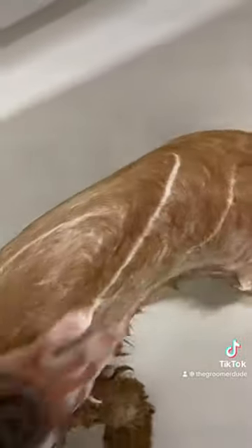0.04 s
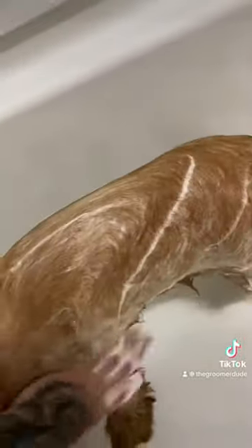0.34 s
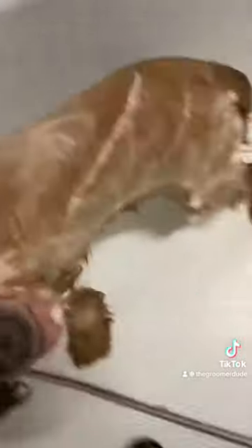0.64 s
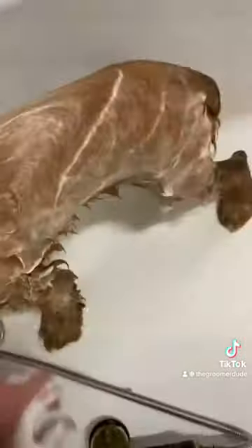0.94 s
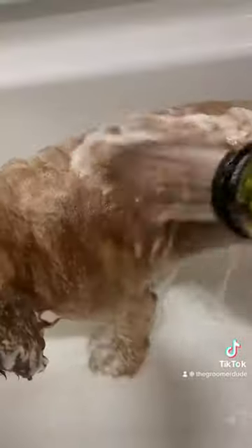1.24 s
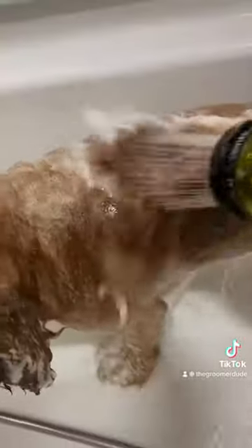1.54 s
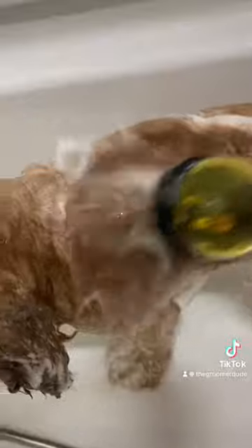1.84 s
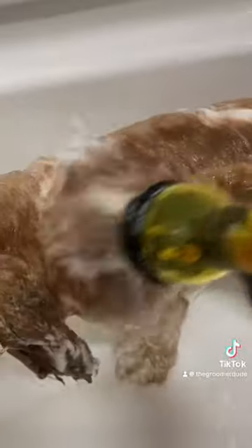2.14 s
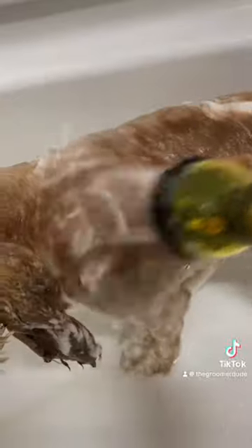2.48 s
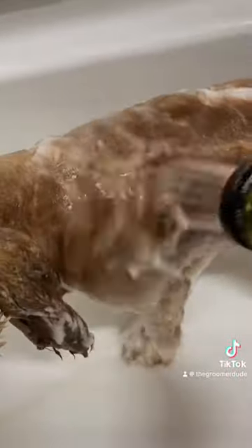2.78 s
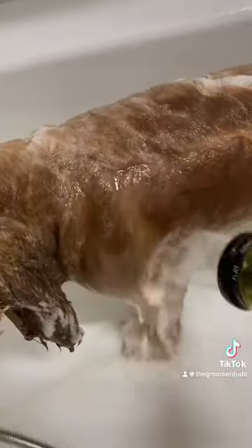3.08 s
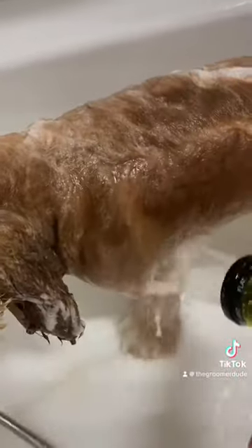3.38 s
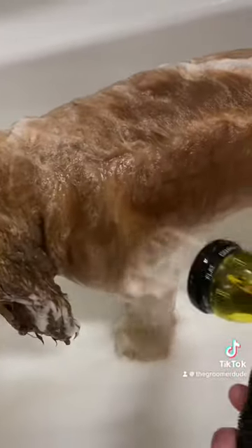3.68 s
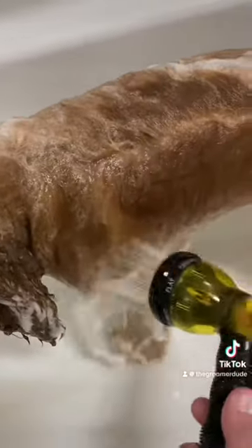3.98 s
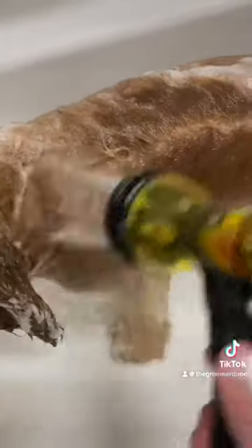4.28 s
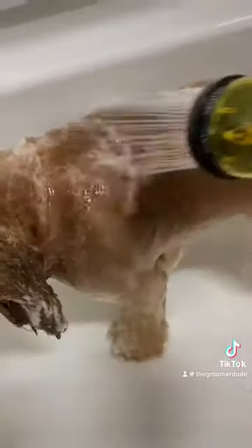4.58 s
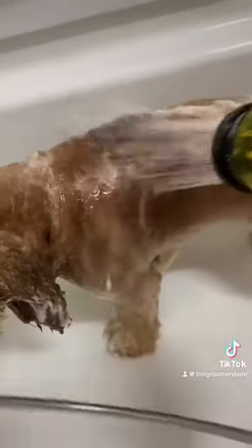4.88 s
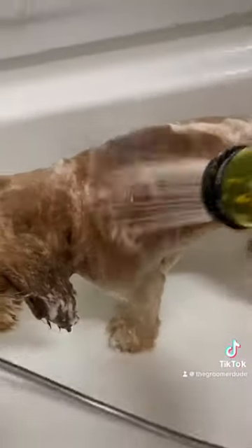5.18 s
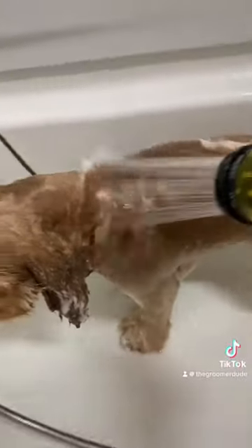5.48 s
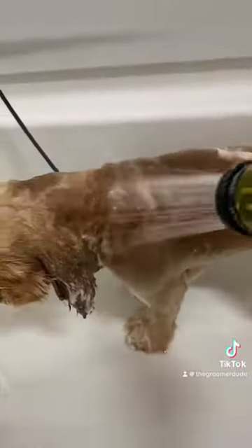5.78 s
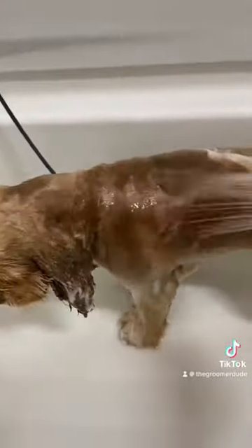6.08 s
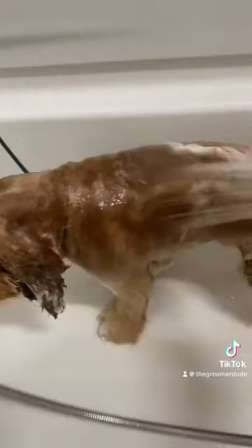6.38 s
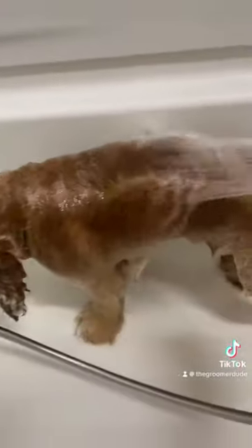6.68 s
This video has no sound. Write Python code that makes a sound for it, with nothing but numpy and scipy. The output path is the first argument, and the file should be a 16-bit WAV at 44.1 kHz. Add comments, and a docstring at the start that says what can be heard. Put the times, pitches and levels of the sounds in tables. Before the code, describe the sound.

For the first second, only a blower is heard, droning somewhere in the room with rushing air, a low rumble and wavering hums. At about 0.9 seconds a hand sprayer opens abruptly, close by, and starts rinsing a dog in a tub. Fine jets make a bright hiss and fizz, with dense droplets pattering on the wet coat. The spray swells and dulls about four times a second as the head moves along the body. Small bubbles ping and wet hollows ring briefly at shifting pitches, and the tub walls add tight reflections. Short, bright spits and single fat drops stand out at around 1, 1.6, 2.8, 3.7 and 4.8 seconds. From about 4 seconds the hiss is slightly softer, but the water keeps running until the end, near 7 seconds. The blower continues behind it throughout, one low hum growing a little stronger after 5 seconds.

```python
"""A hand sprayer rinses a soapy dog in a tub. It opens at once; its fine jets hiss and patter on the
wet coat as dense droplet clicks, swelling and dulling as the head sweeps along the body.
Wet hollows and small bubbles ring, and the tub walls throw the spray back.
Behind it a blower drones in the room: rushing air, rumble, narrow resonances and hums."""
import sys
import numpy as np
from scipy import signal
from scipy.fft import rfft, irfft, next_fast_len
from scipy.io import wavfile
from scipy.ndimage import map_coordinates

SR = 44100
rng = np.random.default_rng(int(sys.argv[2]) if len(sys.argv) > 2 else 0)


def wav_out(sig):
    """Save sig, one row per channel (or a flat mono array), as 16-bit PCM at SR to the path in sys.argv[1]."""
    wavfile.write(sys.argv[1], SR, np.round(np.clip(np.atleast_2d(sig).T, -1, 1) * 32767).astype(np.int16))


N = 301203
TIME = np.arange(N) / SR
OPEN_S = 0.921   # trigger squeezed

# left-right likeness of the spray: (frequency [Hz], correlation [0..1])
SPRAY_CORRELATION = [(700, 1), (1200, 0.86), (1500, 1), (2100, 1), (2800, 0.62), (3500, 0.7), (5500, 0.83),
                     (10000, 0.45), (14000, 0.56)]


def from_db(db):
    """Decibels to gain."""
    return 10 ** (np.asarray(db) / 20)


def unit_rms(x):
    """Scale to rms 1."""
    return x / np.sqrt(np.mean(x ** 2) + 1e-20)


def in_time(rows):
    """Each value column of a time table, per sample."""
    times_s, *columns = np.transpose(rows)
    return [np.interp(TIME, times_s, column) for column in columns]


def at_hz(points, hz):
    """Read a table on a log-frequency axis."""
    known_hz, values = np.transpose(points)
    return np.interp(np.log(hz + 1e-6), np.log(known_hz), values)


def drift(rate_hz):
    """Smooth random motion below about rate_hz; rms 1."""
    hop, settle = 40, 2000
    pole = np.exp(-2 * np.pi * rate_hz * hop / SR)
    noise = rng.standard_normal(N // hop + settle + 2)
    slow = signal.lfilter([1], [1, -2 * pole, pole * pole], noise)[settle:]
    return np.interp(np.arange(N) / hop, np.arange(len(slow)), unit_rms(slow))


def coloured(pair, spectrum, correlation):
    """Two independent signals to stereo of the given spectrum, with steep skirts; rms 1."""
    size = next_fast_len(N)
    hz = np.arange(size // 2 + 1) * SR / size + 1e-3
    low_hz, high_hz = spectrum[0][0], 1.1 * spectrum[-1][0]
    skirts = 1 / np.sqrt((1 + (low_hz / hz) ** 12) * (1 + (hz / high_hz) ** 12))
    mid, side = rfft(pair, size) * from_db(at_hz(spectrum, hz)) * skirts
    alike = np.clip(at_hz(correlation, hz), 0, 1)
    mid, side = np.sqrt(1 + alike) * mid, np.sqrt(1 - alike) * side
    return unit_rms(irfft(np.array([mid + side, mid - side]), size)[:, :N])


def resonate(x, hz, width_hz):
    """One resonance, applied twice for steep skirts; rms 1."""
    radius = np.exp(-1.55 * np.pi * width_hz / SR)
    section = [1, 0, -1, 1, -2 * radius * np.cos(2 * np.pi * hz / SR), radius * radius]
    return unit_rms(signal.sosfilt([section, section], x + 1e-18))


def room_noise(spectrum):
    """Smooth, distant stereo noise; rms 1."""
    # left-right likeness: (frequency [Hz], correlation [0..1])
    correlation = [(130, 1), (200, 1), (260, 1), (400, 0.95), (570, 0.75), (700, 0.68), (1100, 0.4),
                   (2000, 0.95), (2600, 0.53), (4500, 0.71), (12000, 0.59)]
    return coloured(rng.standard_normal((2, N)), spectrum, correlation)


def drones():
    """Moving air excites narrow resonances; each swells and sinks on its own."""
    # blower and room modes: (frequency [Hz], width [Hz], level [dB])
    modes = [(269.2, 8.2, -53), (293.2, 20.4, -56), (336.6, 19.4, -56.5), (387.4, 14.5, -60.5),
             (477.3, 10.7, -57), (571.5, 27, -59), (901, 48, -59), (1119, 19, -64), (1401, 27, -64),
             (2427, 80, -61), (220, 22, -62)]
    out = np.zeros(N)
    for hz, width_hz, level_db in modes:
        gain = from_db(level_db + 2.2 * drift(rate_hz=1.5))
        out += gain * resonate(rng.standard_normal(N + SR), hz, width_hz)[SR:]
    return out


def wavering_tone(hz, waver_hz, waver_db):
    """Sine, unsteady in pitch and level; rms 1."""
    phase = 2 * np.pi * np.cumsum(hz + waver_hz * drift(rate_hz=4.4)) / SR
    return unit_rms(np.sin(phase) * from_db(waver_db * drift(rate_hz=5.5)))


def hums():
    """The blower's two hums and a faint overtone."""
    # lower hum: (time [s], level [dB])
    low_level = [(0, -47), (.35, -49), (.62, -43), (1.05, -52), (3.3, -52), (3.8, -53), (4.5, -54),
                 (5.4, -59), (6.35, -59), (6.83, -53)]
    # upper hum: (time [s], level [dB])
    high_level = [(0, -47), (.6, -62), (.88, -57), (.95, -45), (1.55, -41.5), (2.35, -51.5), (2.8, -44),
                  (4.5, -47.5), (5.12, -45), (5.35, -39), (6.83, -39)]
    # upper hum: (time [s], frequency [Hz])
    high_pitch = [(0, 90), (5.1, 89.5), (5.8, 88), (6.8, 87.5)]
    low_db, = in_time(low_level)
    high_db, = in_time(high_level)
    high_hz, = in_time(high_pitch)
    low = from_db(low_db) * wavering_tone(hz=52.7, waver_hz=1.65, waver_db=2.5)
    high = from_db(high_db) * wavering_tone(high_hz, waver_hz=0.42, waver_db=1.36)
    overtone = from_db(-57.5) * wavering_tone(hz=266.7, waver_hz=1.0, waver_db=0.0)
    return low + high + overtone


def blower():
    """Rushing air over a roar, a rumble, drones and hums."""
    # spectra of the air noise: (frequency [Hz], relative density [dB])
    rush_spectrum = [(500, -3.5), (680, -6), (900, -3.5), (1300, -6.5), (1500, -10.5), (2500, -12.5),
                     (3600, -16.5), (6000, -21), (8500, -36), (12000, -30.5), (15000, -48)]
    roar_spectrum = [(203, -10.5), (230, -7), (275, -0.5), (330, 0), (400, -4.5), (470, -2.5), (520, -18)]
    rumble_spectrum = [(22, -12), (40, -9), (60, -1), (80, 4.5), (105, 5.5), (122, 1), (142, -7)]
    # rumble: (time [s], level [dB])
    rumble_level = [(0, -49), (1.2, -48), (4.1, -48), (5.2, -51.5), (6.83, -57)]
    rumble_db, = in_time(rumble_level)
    hum = hums()
    rush = from_db(-44.5) * room_noise(rush_spectrum)
    roar = from_db(-45.5) * room_noise(roar_spectrum)
    rumble = from_db(rumble_db) * room_noise(rumble_spectrum)
    return rush + roar + rumble + drones() + hum


def bubbles(per_s, spread_db, cycles, pitch_rise, level_db):
    """Run-off traps small bubbles; each rings briefly and rises in pitch."""
    out = np.zeros((2, N + SR))
    for when, smallness, strength, place in rng.random((int(per_s * N / SR), 4)):
        hz = 900 * 4 ** smallness
        life = np.arange(int(cycles * SR / hz)) * hz / (cycles * SR)   # 0..1
        phase = 2 * np.pi * cycles * (life + pitch_rise * life ** 2 / 2)
        ping = np.sin(phase) * from_db(-40 * life)
        pan = from_db(np.array([[1], [-1]]) * (place - .5) * 6)
        start = int(when * N)
        out[:, start:start + len(ping)] += pan * from_db(spread_db * strength ** 3) * ping
    return from_db(level_db) * unit_rms(out[:, :N])


def impacts(per_s, spread_db):
    """Two streams of droplet clicks, mostly small; rms 1."""
    sizes = from_db(spread_db * np.minimum(rng.exponential(1, (2, N)), 4))
    signs = rng.choice([-1, 1], (2, N))
    hits = rng.random((2, N)) < per_s / SR
    return unit_rms(sizes * signs * hits)


def hollows(drops_per_s, spread_db, wander_octaves, wander_rate_hz):
    """Wet hollows ring as the jets cross them; their pitch wanders as they fill and empty."""
    # crossings: (centre [s], half length [s], frequency [Hz], width [Hz], level [dB])
    crossings = [(1.02, .13, 2470, 500, -45), (1.16, .07, 2600, 600, -46), (1.35, 0.087, 2390, 300, -47),
                 (1.35, .18, 1290, 130, -47), (1.63, .08, 2790, 700, -51), (1.62, 0.12, 1080, 120, -48),
                 (1.68, 0.18, 1310, 130, -52), (1.86, .1, 1190, 150, -45), (1.87, 0.17, 910, 110, -45.5),
                 (1.9, 0.087, 2980, 400, -51), (2.0, .6, 2300, 400, -50), (2.16, 0.075, 830, 300, -44),
                 (2.2, 0.25, 3000, 503, -47.5), (2.37, 0.3, 1204, 50, -49), (2.37, 0.066, 2130, 180, -44),
                 (2.83, 0.11, 1800, 200, -50), (2.95, .22, 4020, 690, -54), (2.97, 0.13, 1700, 220, -46),
                 (3.3, .17, 1740, 220, -48), (3.31, .11, 855, 100, -46.5), (3.32, 0.087, 4050, 600, -47),
                 (3.54, 0.086, 2070, 120, -46), (3.57, .15, 1700, 110, -45.5),
                 (3.76, 0.13, 2050, 110, -44.5), (3.76, 0.166, 1665, 130, -44), (3.75, 0.12, 1010, 70, -48),
                 (3.78, 0.14, 4100, 700, -46), (4.0, 0.091, 1900, 500, -43.5),
                 (4.35, 0.15, 1360, 160, -47.5), (4.53, 0.18, 2130, 200, -50),
                 (4.58, 0.115, 1280, 140, -46), (4.84, 0.055, 2800, 350, -45), (5.02, .13, 2870, 400, -47),
                 (5.02, 0.12, 1600, 180, -50), (5.25, 0.32, 994, 60, -49.5), (5.54, 0.145, 1035, 90, -45.5),
                 (5.9, 0.31, 1020, 55, -47.5), (6.15, .2, 2490, 110, -49.5), (6.15, 0.35, 2450, 600, -52),
                 (6.55, .3, 1025, 55, -49.5), (6.79, .07, 1900, 400, -43), (6.79, .06, 2700, 700, -43.5)]
    out = np.zeros(N)
    drops = impacts(drops_per_s, spread_db)
    pitch_ratio = 2 ** (wander_octaves * drift(wander_rate_hz))
    for k, (centre_s, half_s, hz, width_hz, level_db) in enumerate(crossings):
        hit = np.abs(TIME - centre_s) < half_s
        ring = resonate(drops[k % 2, hit], hz, width_hz)
        ring = map_coordinates(ring, [np.cumsum(pitch_ratio[hit])], order=3)
        swell = np.cos(np.pi / 2 * (TIME[hit] - centre_s) / half_s) ** 2
        out[hit] += from_db(level_db) * swell * ring
    return out


def tub(x, path_sway):
    """Early echoes off the walls; their paths change as the hand moves."""
    # wall echoes: (delay [s], reflected share [0..1])
    walls = [(.0011, 0.2), (.0023, 0.16), (.0041, 0.63), (.0067, .18), (0.0112, 0.54)]
    out = x.copy()
    for delay_s, share in walls:
        sent_s = TIME - delay_s * (1 + path_sway * drift(rate_hz=0.5725))
        out += share * np.array([map_coordinates(side, [sent_s * SR], order=3) for side in x])
    return out / np.sqrt(1 + sum(share ** 2 for _, share in walls))


def nozzle():
    """Thin jets sizzle as they leave the head, the same wherever it points."""
    # sizzle: (frequency [Hz], relative density [dB])
    spectrum = [(10500, -22), (11600, -8.5), (12300, -17), (13800, -15), (14600, 0), (15800, 0)]
    return from_db(-47.5) * coloured(impacts(per_s=9000, spread_db=3), spectrum, SPRAY_CORRELATION)


def spits():
    """A jet catches a tuft: a short, bright shower. The shortest are single fat drops."""
    # showers: (time [s], level [dB], half length [s])
    showers = [(.966, -35, .0012), (1.043, -40, .022), (1.648, -40, .016), (2.155, -47, .024),
               (2.173, -37, .0012), (2.445, -36, .0008), (2.77, -44, .025), (2.83, -51, .012),
               (3.4, -44, .0008), (3.558, -36, .001), (3.736, -41, .035), (4.598, -44.5, .012),
               (4.708, -42.5, .012), (4.837, -37, .0012), (4.858, -47, .02), (4.924, -40, .0012),
               (5.355, -46, .012), (5.57, -42, .0012), (5.778, -54, .035), (6.11, -51, .025)]
    # shower spectrum: (frequency [Hz], relative density [dB])
    spectrum = [(3500, -23), (6000, 12.5), (8000, 10), (12000, 8.5), (15500, -18)]
    envelope = sum(from_db(level_db) * np.exp(-np.minimum(((TIME - centre_s) / half_s) ** 2, 20))
                   for centre_s, level_db, half_s in showers)
    return envelope * coloured(impacts(per_s=2775, spread_db=2.5), spectrum, SPRAY_CORRELATION)


def wet_coat(x, patchy_db, patchy_rate_hz):
    """Folds and pools in the coat favour ever-changing narrow bands of the midrange."""
    out = 0
    for edge_hz in 800 * 2 ** (np.arange(13) / 5):
        band = signal.sosfiltfilt(signal.butter(10, edge_hz, fs=SR, output="sos"), x)
        out = out + band * from_db(patchy_db * drift(patchy_rate_hz))
        x = x - band
    return out + x


def hand(stroke_half_s, wobble_db):
    """Splatter, fizz and mist levels in dB: slow aim, a swish per stroke, wobble, opening surge."""
    # travel along the body: (time [s], splatter [dB], fizz [dB], mist [dB])
    aim = [(.94, -46, -40.5, -37.5), (1.3, -42.5, -43, -39), (1.9, -43, -42, -38.5),
           (2.45, -45.5, -43.5, -40), (2.7, -43, -43.5, -38.5), (3.0, -43, -41.5, -38),
           (3.2, -43, -44.5, -41), (3.45, -44.5, -45, -39.5), (3.78, -41.5, -41, -39),
           (4.1, -48.5, -45, -42.5), (4.4, -43.5, -46.5, -42.8), (4.75, -45, -48, -43.5),
           (5.2, -43.5, -45.5, -41.5), (5.55, -45, -47.5, -42.5), (5.9, -44, -48, -43),
           (6.3, -43, -48.5, -44), (6.83, -44.5, -47.5, -44.5)]
    # wrist flicks, about 4 per s: (time [s], added splatter [dB], added fizz [dB], added mist [dB])
    strokes = [(1.14, 3, -2.5, -1.5), (1.35, -0.5, 2, 1), (1.63, 2, 3.5, 1.5), (1.88, 3.5, -1, -0.5),
               (2.17, 4, -0.5, 1.5), (2.38, 3.5, 1, 1), (2.6, 1.5, 3.5, 1), (2.8, 2, 3, 3),
               (3.05, 1.5, 2, 0), (3.32, 1, 4, 1.5), (3.58, -2.5, 3.5, 1.5), (3.76, -2, 2, 1.5),
               (4.0, 0, 4.5, 4.5), (4.22, 3.5, 1.5, 3.5), (4.4, 0, 1, 2.5), (4.66, -0.5, 3.5, 3),
               (4.92, 2, 2, 3.5), (5.16, 2, 0.5, 3.5), (5.37, 0.5, 1, 2), (5.55, 1, 3, 0.5),
               (5.76, 2, 1.5, 2.5), (6.07, 0.5, 3, 2), (6.29, -1, 1, 1.5), (6.48, 1, 2, 1.5),
               (6.68, 2, .5, 3)]
    levels_db = np.array(in_time(aim))
    for centre_s, *swells_db in strokes:
        near = np.abs(TIME - centre_s) < 4 * stroke_half_s
        swish = np.exp(-((TIME[near] - centre_s) / stroke_half_s) ** 2)
        levels_db[:, near] += np.outer(swells_db, swish)
    opening_db = 2 * np.exp(-np.abs(TIME - OPEN_S) / .04)   # stored hose pressure drains off
    return levels_db + wobble_db * drift(rate_hz=13.4) + opening_db


def valve(rise_s):
    """The water starts abruptly; gain 0..1."""
    return np.clip((TIME - OPEN_S) / rise_s, 0, 1)


def spray(surge_db, surge_rate_hz, sputter_db):
    """Jets break into drops: big ones splatter on the coat, small ones fizz in the fur, mist hisses."""
    # spectra by drop size: (frequency [Hz], relative density [dB])
    splatter_spectrum = [(450, -12), (750, -5), (1050, 0), (1400, 0), (1750, -3.5), (2250, -.5),
                         (3200, -6.5), (4500, -7.5), (8000, -72)]
    fizz_spectrum = [(1800, -24), (2900, -8.5), (3700, -11.5), (4500, -6), (5400, -3.5), (6300, -4),
                     (7200, -23), (8500, -69)]
    mist_spectrum = [(5000, -22), (7300, -11), (8600, 0), (11800, 2.3), (12600, -3), (13500, -6),
                     (15500, -2.5)]
    splatter_db, fizz_db, mist_db = hand(stroke_half_s=0.052, wobble_db=0.76)
    surge = from_db(surge_db * drift(surge_rate_hz))   # drops crowd as the water surges
    big_drops = impacts(per_s=5000 * np.sqrt(surge), spread_db=1.64)
    small_drops = impacts(per_s=9000 * surge, spread_db=2.1)
    finest_drops = impacts(per_s=12000 * surge, spread_db=1.9)
    splatter = from_db(splatter_db) * coloured(big_drops, splatter_spectrum, SPRAY_CORRELATION)
    fizz = from_db(fizz_db) * coloured(small_drops, fizz_spectrum, SPRAY_CORRELATION)
    mist = from_db(mist_db) * coloured(finest_drops, mist_spectrum, SPRAY_CORRELATION)
    sputter = from_db(sputter_db * drift(rate_hz=90))   # fine drops arrive in clumps
    return wet_coat(splatter + sputter * (fizz + mist), patchy_db=2.0, patchy_rate_hz=8.3)


def scene():
    """The spray in the tub, the blower behind it."""
    jets = spray(surge_db=0.66, surge_rate_hz=25.0, sputter_db=0.9) + spits() + nozzle()
    ringing = hollows(drops_per_s=1045, spread_db=2.0, wander_octaves=.012, wander_rate_hz=6.94)
    pings = bubbles(per_s=110, spread_db=6, cycles=70, pitch_rise=0.13, level_db=-52.5)
    flow = valve(rise_s=0.0046)
    water = tub(flow * jets, path_sway=0.0617) + flow * (ringing + pings)
    return water + blower()


def record(dry):
    """Steep low-pass on the top treble."""
    cutoff_hz = 15850
    return signal.sosfilt(signal.ellip(12, .2, 80, cutoff_hz, fs=SR, output="sos"), dry)


dry = scene()
out = record(dry)
wav_out(out)
```